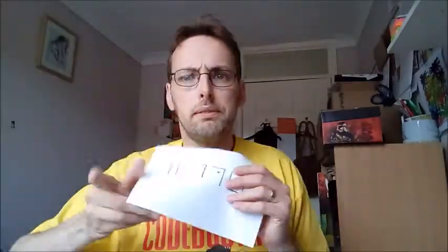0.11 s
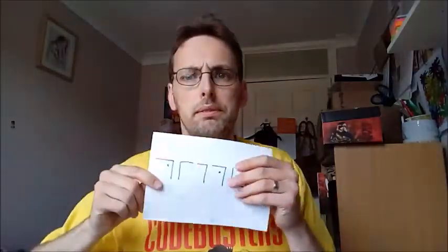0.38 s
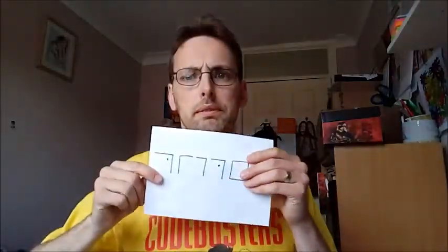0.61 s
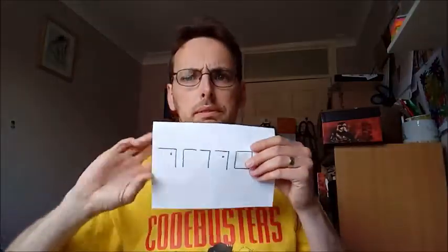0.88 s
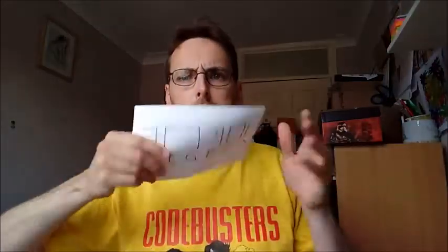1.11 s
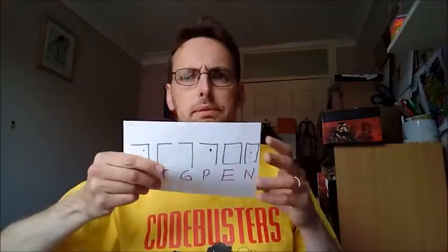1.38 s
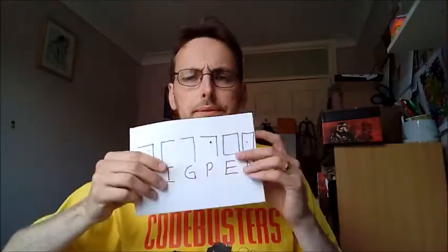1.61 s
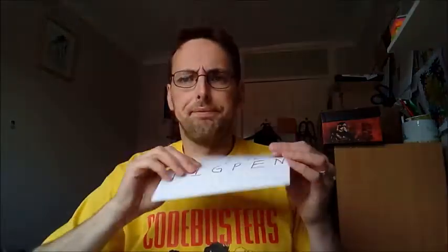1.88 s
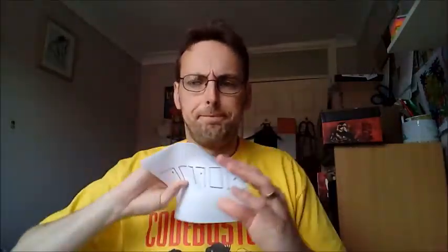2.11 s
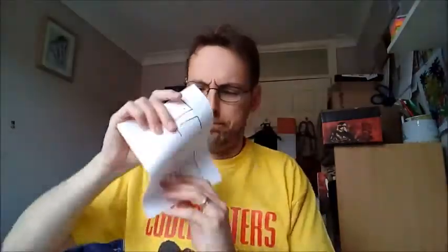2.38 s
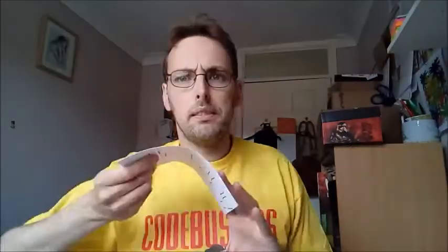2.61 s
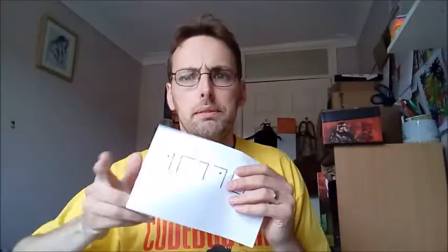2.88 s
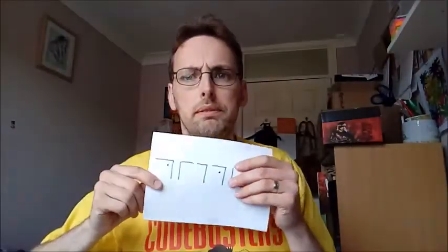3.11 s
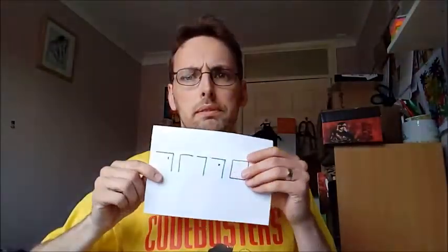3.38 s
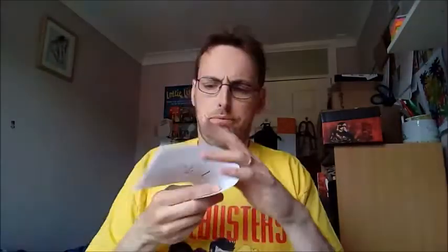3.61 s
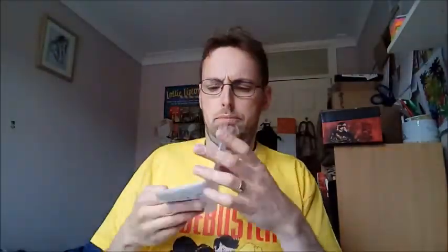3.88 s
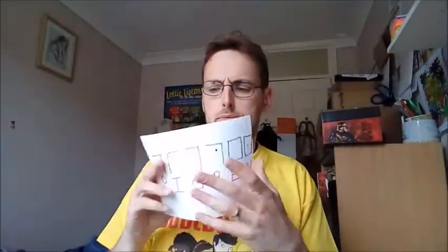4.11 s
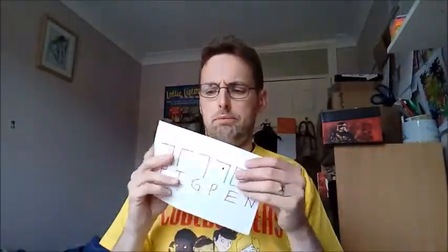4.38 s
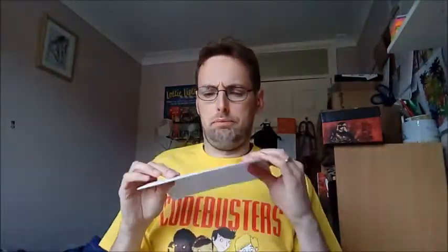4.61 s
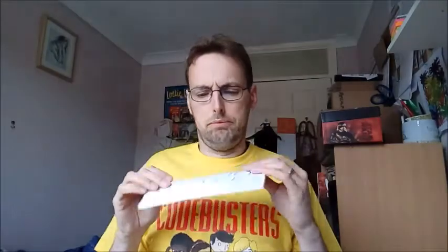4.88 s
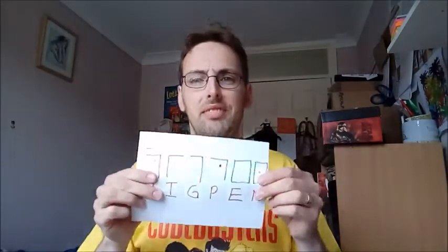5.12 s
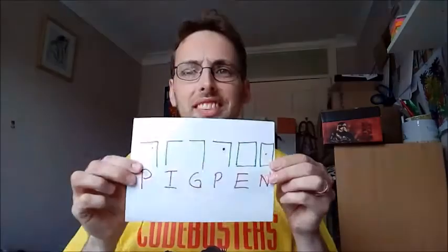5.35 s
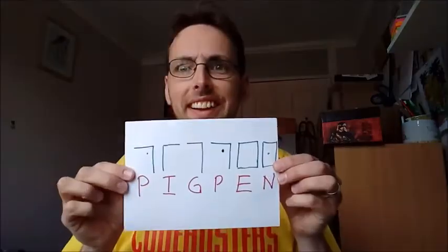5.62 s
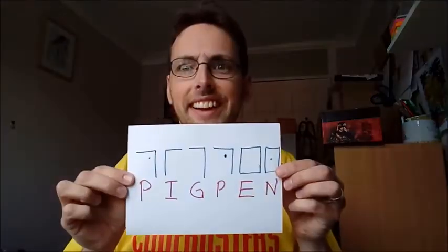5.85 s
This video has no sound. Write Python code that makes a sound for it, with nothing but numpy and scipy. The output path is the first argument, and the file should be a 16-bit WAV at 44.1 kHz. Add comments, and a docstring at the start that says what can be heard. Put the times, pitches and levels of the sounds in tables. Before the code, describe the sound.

Dry, mid-bright paper sounds in a small room with very short echoes and low microphone hiss. Flexing pops and crackles, a pause, a cluster of hard snaps, and swishing rustles are abruptly chopped. The first crinkles return as an exact repeat, cut off again, before denser rubbing, snapping and unfolding, with low puffs of air, gradually calm down.

```python
"""A furnished room, where a sheet of paper is bent, turned and unfolded by hand close to a small microphone.
Fingers slide over it as a bright filtered hiss, and the flexing sheet adds a duller rustle and pushed air.
Panels ring as they pop over, the taut sheet hums, and creases snap into short bursts of crackle.
A hard edit chops off the sound and its echoes; shortly after, the opening moves are heard once more.
A second hard edit ends this repeat and leads to the last moves."""
import sys
import numpy as np
from scipy import signal
from scipy.io import wavfile
from scipy.ndimage import uniform_filter1d

SR = 44100
rng = np.random.default_rng(int(sys.argv[2]) if len(sys.argv) > 2 else 0)


def how_loud(loudness_db):
    """Turn decibels into a plain amplitude multiplier (0 dB gives 1, 20 dB gives 10)."""
    steps = np.asarray(loudness_db, float) / 20
    return 10 ** steps


def dump_mix(stems):
    """Bounce the given channels to the path in sys.argv[1] as a 16-bit WAV at rate SR."""
    frames = np.atleast_2d(stems).T  # one column per channel
    limited = np.clip(frames, -1, 1)  # hard clip at full scale
    pcm = np.round(limited * 32767).astype(np.int16)
    wavfile.write(sys.argv[1], SR, pcm)


N = 264114  # length in samples, about 6 s


def evened(x):
    """Scales to rms 1."""
    return x / np.sqrt(np.mean(x ** 2) + 1e-20)


def read(points, hz):
    """Reads a table on a log-frequency axis."""
    f, value = np.transpose(points)
    return np.interp(np.log(hz + 1), np.log(f + 1), value)


def coloured(x, spectrum):
    """Causal filter with the given spectral shape; white noise keeps its power."""
    gain_db = read(spectrum, abs(np.fft.fftfreq(8192, 1 / SR)))
    log_gain = gain_db * np.log(10) / 20
    # minimum phase: the filter answers as early as its spectrum allows
    response = np.exp(np.conj(signal.hilbert(log_gain)))
    taps = np.fft.ifft(response).real[:4096]
    return signal.oaconvolve(x, taps / np.linalg.norm(taps))[:N]


def grit(spread_db, clump_db, size):
    """Noise whose samples differ widely in strength and come in clumps (size in samples)."""
    clumps = evened(uniform_filter1d(rng.standard_normal(N), size))
    strength = np.minimum(rng.exponential(1, N), 4.5)
    return evened(rng.standard_normal(N) * how_loud(spread_db * strength + clump_db * clumps))


def patchy(x, patchy_db):
    """Colour drifts in patches as other parts of the sheet are touched."""
    z = signal.stft(x, nperseg=256)[2]
    patches = rng.standard_normal(z.shape[::-1]).T
    patches = uniform_filter1d(patches, size=5, axis=0)  # smooth over frequency
    patches = evened(uniform_filter1d(patches, size=14, axis=1))  # smooth over time
    return signal.istft(z * how_loud(patchy_db * patches), nperseg=256)[1][:N]


# moments of the two hard edits: (first [s], second [s])
EDITS = (2.618, 3.518)
EDGE_DB, ROUND = -11.5, 1.75  # loss one rise or fall time from the peak; 1 = pointed top, 2 = dome


def moves(table, stretch):
    """Each move swells and sinks, its fall time times stretch; gives gains of the move and its companion."""
    t, power = np.arange(0, N + 64, 64) / SR, 0
    for s, db, rise, fall, with_db in table:
        away = np.where(t < s, (s - t) / rise, (t - s) / (fall * stretch))
        swell = how_loud(db + EDGE_DB * np.minimum(away, 8) ** ROUND)
        swell = swell * ((s > EDITS[0]) | (t < EDITS[0]))  # the first edit silences earlier moves
        both = swell * how_loud(np.array([[0], [with_db]]))
        power = power + both ** 2  # powers add
    return [np.interp(np.arange(N) / SR, t, np.sqrt(p)) for p in power]


# colour of the microphone hiss: (frequency [Hz], relative level [dB])
HISS_COLOUR = [(30, -22), (110, -20.5), (190, -29), (300, -18), (700, -9.5), (1500, -6), (4600, -7),
               (6300, -9.5), (7600, -22), (9000, -24.5), (13500, -28), (14300, -18.5), (15800, -16.5)]
HISS_DB, WHINE_DB = -65.5, -74  # rms levels of the hiss and of the faint fuzzy whistle in it
WHINE_HZ, WHINE_WIDTH_HZ = 5830, 140


def hiss():
    """Steady microphone hiss is coloured noise, with a narrow noise band as a faint whistle."""
    edges = [WHINE_HZ - WHINE_WIDTH_HZ / 2, WHINE_HZ + WHINE_WIDTH_HZ / 2]
    band = signal.butter(2, edges, "band", fs=SR, output="sos")
    whistle = evened(signal.sosfilt(band, rng.standard_normal(N)))
    return how_loud(HISS_DB) * coloured(rng.standard_normal(N), HISS_COLOUR) + how_loud(WHINE_DB) * whistle


# how long echoes take to fall by 60 dB: (frequency [Hz], time [s])
ECHO_TIME = [(200, 0.2), (1000, 0.19), (4000, 0.12), (10000, 0.16)]


def room(x):
    """Echoes are sparse taps of random sign, each frequency band dying at its own speed."""
    taps = np.zeros(SR // 2)
    at = np.arange(140, len(taps) - 20, 20)
    taps[at + rng.integers(0, 20, len(at))] = rng.choice([-1., 1.], len(at))
    hz, t, z = signal.stft(taps, SR, nperseg=256)
    decay = how_loud(-60 * t / read(ECHO_TIME, hz)[:, None])
    tail = signal.istft(z * decay, SR, nperseg=256)[1]
    return [signal.oaconvolve(part, tail / np.linalg.norm(tail))[:N] for part in x]


# the sheet bending: (peak time [s], relative level [dB], rise time [s], fall time before stretch [s],
# pushed air against the level [dB])
BENDS_OF_SHEET = [(0.0, -46.5, .02, 0.034, -41), (.14, -61, 0.029, .06, -12), (.25, -41, 0.088, 0.11, -22),
                  (.35, -51, .03, 0.026, -14), (.46, -49, 0.037, 0.036, -12),
                  (.55, -57.5, 0.055, 0.16, -43), (.79, -64.5, 0.088, .2, -35),
                  (1.15, -61, 0.057, 0.084, -0.5), (1.34, -52, 0.0867, 0.026, -30),
                  (1.436, -62, .05, .035, -31), (1.62, -56.5, 0.029, 0.21, -31),
                  (1.794, -45, 0.04, 0.061, -35), (1.97, -40, 0.089, 0.051, -33),
                  (2.076, -39, 0.059, 0.11, -32), (2.22, -41.5, 0.079, 0.17, -33),
                  (2.34, -45, 0.15, 0.099, -26.5), (2.578, -41.5, 0.088, 0.03, -28),
                  (2.63, -56, .02, 0.024, -28), (2.71, -48.5, .03, .06, -45),
                  (3.52, -35.5, 0.025, 0.07, -44), (3.72, -51, 0.03, .03, -53),
                  (3.85, -44.5, 0.091, .06, -33), (3.97, -43, .08, 0.042, -37),
                  (4.07, -38.5, 0.063, 0.062, -39), (4.167, -49, 0.032, 0.012, -23),
                  (4.32, -40.5, 0.11, 0.08, -29.5), (4.41, -31, .06, 0.046, -27),
                  (4.556, -53, 0.0066, 0.047, -30), (4.68, -48.5, 0.048, 0.055, -34),
                  (4.77, -44, 0.11, 0.028, -35), (5.0, -64, .06, 0.12, -54), (5.09, -42, 0.093, 0.087, -36),
                  (5.16, -48.5, 0.048, .04, -17), (5.24, -51.5, 0.14, 0.048, -40),
                  (5.35, -61.5, 0.063, 0.3, -43), (5.7, -61.5, 0.17, 0.13, -43),
                  (5.9, -64.5, 0.12, 0.12, -43.5)]
# colour of the air moved by the whole sheet: (frequency [Hz], relative level [dB])
AIR_COLOUR = [(20, -17), (60, -11), (115, -4), (170, -10), (230, -33), (500, -63)]


def pushed_air():
    """The bending sheet fans the air: low noise swells with each bend."""
    push = moves(BENDS_OF_SHEET, stretch=0.7)[1]
    return coloured(push * rng.standard_normal(N), AIR_COLOUR)


# colour of wide panels flexing, also used for dull crackle: (frequency [Hz], relative level [dB])
DULL_COLOUR = [(100, -52.5), (400, -5.5), (800, 6), (1400, 0), (2200, -4), (3500, -9.5), (8000, -50)]


def flexing():
    """Wide panels flex with a dull, clumpy rustle that follows each bend."""
    flex = moves(BENDS_OF_SHEET, stretch=0.86)[0]
    panels = grit(spread_db=4.0, clump_db=2.5, size=500)
    return coloured(flex * panels, DULL_COLOUR)


# fingers sliding: (peak time [s], relative level [dB], rise time [s], fall time [s],
# sheen above 8 kHz against the level [dB])
FINGER_SLIDES = [(.07, -52.5, 0.18, 0.07, -17.5), (.27, -45, 0.13, .12, -10), (.5, -50, 0.096, 0.17, -15.5),
                 (.8, -53.5, 0.36, 0.078, -14), (1.17, -48.5, 0.061, 0.048, 4), (1.27, -62, .06, 0.11, -28),
                 (1.47, -61, 0.052, 0.081, -17.5), (1.73, -49.5, 0.13, 0.13, -12.5),
                 (1.844, -45.5, 0.046, 0.023, -14), (1.97, -41, 0.068, 0.064, -9),
                 (2.08, -39, 0.051, 0.14, -11.5), (2.195, -34.5, 0.016, 0.11, -11.5),
                 (2.45, -42, 0.067, 0.23, -10), (2.58, -41, 0.12, .1, -10.5),
                 (2.69, -56.5, 0.042, .05, -16), (3.52, -42, .01, 0.25, -14), (3.72, -43, 0.19, 0.018, -10),
                 (3.85, -42.5, 0.095, .03, -11.5), (3.9, -30, 0.014, 0.084, -17.5),
                 (4.035, -38, .03, 0.034, -11.5), (4.064, -28.5, 0.0077, 0.039, -7),
                 (4.32, -41.5, 0.093, 0.089, -17.5), (4.42, -40.5, 0.098, 0.1, -14.5),
                 (4.53, -40, 0.22, 0.032, -11.5), (4.66, -40, 0.068, .07, -13),
                 (4.75, -48.5, .05, 0.081, -14), (5.0, -43, 0.068, 0.11, -14), (5.146, -46, .03, 0.037, -7),
                 (5.26, -51, 0.19, 0.026, -9), (5.35, -48, 0.1, 0.095, -10), (5.5, -48, 0.091, 0.063, -19),
                 (5.71, -55.5, 0.15, .12, -25.5)]
# colour of skin on paper: (frequency [Hz], relative level [dB])
SKIN_COLOUR = [(200, -31.5), (1280, -18.5), (1740, 0), (2000, -14), (2900, -4), (3600, -4.5), (6470, 1),
               (7400, -17), (8500, -15), (13000, -54)]
# colour of fingertips brushing fibres: (frequency [Hz], relative level [dB])
SHEEN_COLOUR = [(6000, -31.5), (7600, 5), (8300, -7.5), (9000, -1.5), (11000, -11), (13500, -25),
                (15500, -27.5)]


def sliding():
    """Fingers rub along the sheet: one gritty noise drives both the hiss and its finer sheen."""
    slide, sheen = moves(FINGER_SLIDES, stretch=1)
    skin = grit(spread_db=1.5, clump_db=0.0, size=300)
    return coloured(slide * skin, SKIN_COLOUR) + coloured(sheen * skin, SHEEN_COLOUR)


# the taut sheet humming: (peak time [s], relative level [dB], rise time [s], fall time before stretch [s],
# upper band against the level [dB])
TAUT_HUMS = [(.47, -53, 0.015, 0.045, -14), (1.31, -40, 0.024, 0.045, -8), (2.08, -45, 0.1, 0.094, -10.5),
             (3.92, -41.5, 0.016, 0.025, 18), (4.42, -58, 0.084, 0.073, 15), (4.69, -48.5, 0.068, 0.06, -7),
             (4.99, -53, 0.074, 0.24, -7.5), (5.4, -72, 0.18, 0.23, 11.5)]
HUM_HZ, HUM_UPPER_HZ, HUM_WIDTH_HZ = 780, 1202, 46


def hums():
    """Rubbing noise is heard through two narrow resonances of the taut sheet."""
    out = 0
    for hz, gain in zip((HUM_HZ, HUM_UPPER_HZ), moves(TAUT_HUMS, stretch=0.79)):
        edges = [hz - HUM_WIDTH_HZ / 2, hz + HUM_WIDTH_HZ / 2]
        band = signal.butter(1, edges, "band", fs=SR, output="sos")
        out = out + gain * evened(signal.sosfilt(band, rng.standard_normal(N)))
    return out


# panels popping over: (time [s], relative snap level [dB], ring frequency [Hz])
PANEL_POPS = [(.151, -21, 1600), (.165, -10, 1740), (.179, -11, 1650), (.192, -8.5, 1670), (.216, -7, 1620),
              (.353, -12.5, 1610), (.366, -18, 1670), (.441, -28, 426), (.454, -8, 727), (1.122, -14, 4200),
              (1.142, 5, 4080), (1.152, -1.5, 810), (1.169, -8, 4170), (1.21, 0.5, 1334), (1.3, -35, 850),
              (1.433, -24, 1310), (1.471, -7.5, 1240), (1.784, -17, 1710), (2.051, -17, 780),
              (2.187, -11, 1594), (2.189, -19, 5600), (2.26, -19, 1200), (2.288, -15, 4400),
              (2.303, -19, 3050), (2.318, -15, 2770), (2.548, -21, 1560), (2.581, -1.5, 2117),
              (3.89, -12, 1295), (3.908, -16, 780), (4.059, -10, 4350), (4.062, -2.5, 6360),
              (4.067, -14, 1050), (4.202, -21, 1130), (4.225, -9, 3060), (4.227, -27, 434),
              (4.329, -22, 1380), (4.357, -9, 1330), (4.402, -8, 2300), (4.548, -26.5, 430),
              (4.724, -23.5, 770), (5.07, -13.5, 1230), (5.118, -11.5, 1610)]
PANEL_DB = -12  # ring of a panel against its snap level


def pops():
    """Each panel rings for some cycles as it flips, small panels higher and shorter."""
    t = np.arange(SR // 8) / SR
    snaps = np.zeros(N + len(t))
    for s, snap_db, hz in PANEL_POPS:
        ring = np.exp(-t * (60 + hz / 6.2)) * (1 - np.exp(-t * hz * 2.9))
        ring = ring * np.sin(2 * np.pi * hz * t)
        snaps[round(s * SR):][:len(t)] += how_loud(snap_db + PANEL_DB) * ring
    return snaps[:N]


# creases giving way: (time [s], relative dull crackle level [dB], bright crackle against dull [dB],
# dying time [s])
CREASE_SNAPS = [(.057, -52, 0.5, 0.042), (0.127, -42.5, -1.5, 0.039), (.151, -31.5, 5.5, 0.055),
                (0.163, -31, -6, 0.07), (0.178, -31, 9, 0.013), (0.191, -25, 3.5, 0.0046),
                (.216, -34, 2.5, 0.03), (0.253, -35.5, 3.5, 0.0089), (0.336, -29.5, -2.5, 0.021),
                (0.351, -31, -4, 0.0019), (0.365, -27, -38, 0.012), (.439, -25.5, -9, 0.015),
                (0.453, -29, -45, 0.015), (1.085, -43.5, -4.5, 0.015), (1.107, -33.5, -3.5, 0.023),
                (1.122, -20.5, 3.5, 0.0078), (1.135, -28, 9.5, 0.0088), (1.14, -33.5, 17, 0.016),
                (1.154, -27, 10, 0.016), (1.168, -27, 1, 0.041), (1.212, -24.5, -17, 0.0063),
                (1.298, -30, -9.5, 0.012), (1.433, -44, -8, 0.037), (1.456, -37.5, 6.5, 0.0092),
                (1.47, -36.5, 7.5, 0.02), (1.628, -41.5, -8, .02), (1.784, -32.5, -13, 0.0095),
                (1.966, -37.5, -11, 0.018), (2.051, -45, 10.5, 0.0078), (2.125, -37.5, -3, 0.018),
                (2.187, -25, -1.5, 0.0075), (2.204, -36.5, 0.5, 0.025), (2.261, -39.5, 1, .021),
                (2.287, -31, 1.5, 0.012), (2.303, -32, 3, 0.0081), (2.317, -44.5, 5, 0.035),
                (2.516, -41, -1, 0.014), (2.547, -41, 7, 0.0047), (2.58, -34, 11, 0.012),
                (2.591, -37, -8, 0.0065), (2.705, -42, -2, 0.0054), (2.715, -45, -1.5, 0.016),
                (3.519, -36, -1.5, 0.0096), (3.604, -47.5, 6, 0.071), (3.635, -50.5, 14, 0.011),
                (3.71, -52, 10.5, 0.046), (3.747, -38.5, 2, 0.0025), (3.843, -39.5, 3, 0.0051),
                (3.891, -52, 18, .0085), (3.9, -28, 10, 0.015), (3.907, -25, 7, 0.0026),
                (3.939, -38, 12.5, 0.0071), (4.019, -45.5, 6.5, 0.013), (4.061, -37, 6.5, 0.0074),
                (4.068, -44, 4, 0.013), (4.163, -39, -12, 0.0054), (4.203, -45, -11, 0.023),
                (4.226, -25.5, -1.5, 0.0077), (4.329, -39, -7, 0.086), (4.358, -29, 2.5, 0.017),
                (4.403, -33.5, 5.5, 0.0092), (4.446, -32.5, -4.5, 0.016), (4.544, -46, 6.5, 0.0086),
                (4.619, -64, 6, 0.0086), (4.725, -37.5, 4.5, 0.0074), (5.004, -43.5, -4.5, 0.022),
                (5.025, -42.5, 3.5, 0.0065), (5.072, -28.5, -11, 0.0073), (5.119, -26.5, -30, .013),
                (5.144, -40.5, 0, 0.018)]
# colour of fibres cracking: (frequency [Hz], relative level [dB])
BRIGHT_COLOUR = [(700, -53), (1600, 6.5), (2600, 8), (3600, 3), (4500, 3.5), (6400, 0.5), (7500, -9.5),
                 (10000, -19.5), (13500, -39.5), (15500, -78)]
CLICK_DB = 11.5  # the single crack that opens a crease, against its crackle
RISE = .09  # rise time as a share of the dying time
FRONT, FRONT_S = .6, .003  # extra height of the first burst and its dying time (s)


def creases(early):
    """Each crease clicks and its fibres burst into a dying crackle of dull and bright cracks."""
    t = np.arange(SR // 4) / SR
    dull, bright, dull_click, bright_click = np.zeros((4, N + len(t)))
    for s, dull_db, against_db, dying in CREASE_SNAPS:
        at = slice(round(s * SR), round(s * SR) + len(t))
        bright_db = dull_db + against_db
        fall = np.exp(-t / dying) * (1 - np.exp(-t / (RISE * dying)))  # long tears swell in more gently
        fall *= 1 + FRONT * np.exp(-t / FRONT_S)  # the first fibres break hardest
        fall *= (s > EDITS[0]) | early[at]  # the first edit silences what still crackles
        dull_click[at.start] = how_loud(dull_db + CLICK_DB)
        bright_click[at.start] = how_loud(bright_db + CLICK_DB)
        dull[at] += (how_loud(dull_db) * fall) ** 2  # powers add
        bright[at] += (how_loud(bright_db) * fall) ** 2
    cracks = grit(spread_db=3.2, clump_db=1.8, size=70)  # the same cracks drive both colours
    crackle = coloured(np.sqrt(dull[:N]) * cracks, DULL_COLOUR)
    crackle = crackle + coloured(np.sqrt(bright[:N]) * cracks, BRIGHT_COLOUR)
    clicks = coloured(dull_click, DULL_COLOUR) + coloured(bright_click, BRIGHT_COLOUR)
    return patchy(crackle, patchy_db=3.5) + clicks


# colour given by the microphone's port and case: (frequency [Hz], relative level [dB])
MICROPHONE_COLOUR = [(60, -30.5), (225, -4), (300, 1), (440, -3.5), (550, -18), (640, -7), (775, -6),
                     (900, -10.5), (1020, -9), (1250, -1), (7000, 2), (12000, -1), (14000, 0.5)]
RUSTLE_DB, ROOM_DB = -3.5, -9.5  # gains of sliding and flexing, and of the echoes
REPLAY_S = 120539 / SR  # when the opening starts again


def scene():
    """Paper in the room; the first edit chops the echoes off, then the opening is heard again."""
    early = np.arange(N) < EDITS[0] * SR
    rustle = patchy(sliding() + flexing(), patchy_db=3.0)
    paper = how_loud(RUSTLE_DB) * rustle + creases(early) + pops() + hums()
    paper = coloured(paper, MICROPHONE_COLOUR)
    before, after = room([paper, paper * ~early])
    echoes = np.where(early, before, after)
    mix = paper + how_loud(ROOM_DB) * echoes + pushed_air() + hiss()
    start, end = round(REPLAY_S * SR), round(EDITS[1] * SR)
    # the opening fades in over 400 samples and stops hard at the second edit
    blend = np.sin(np.minimum(np.arange(end - start) / 400, 1) * np.pi / 2)
    mix[start:end] = blend * mix[:end - start] + np.sqrt(1 - blend ** 2) * mix[start:end]
    return mix[None]


def band_limit(x):
    """A steep low-pass at the top of the band."""
    return signal.sosfilt(signal.butter(12, 16310, fs=SR, output="sos"), x)


def record(dry):
    """Turns the finished mix into the sound that is written out."""
    return band_limit(dry)


dry = scene()
out = record(dry)
dump_mix(out)
```